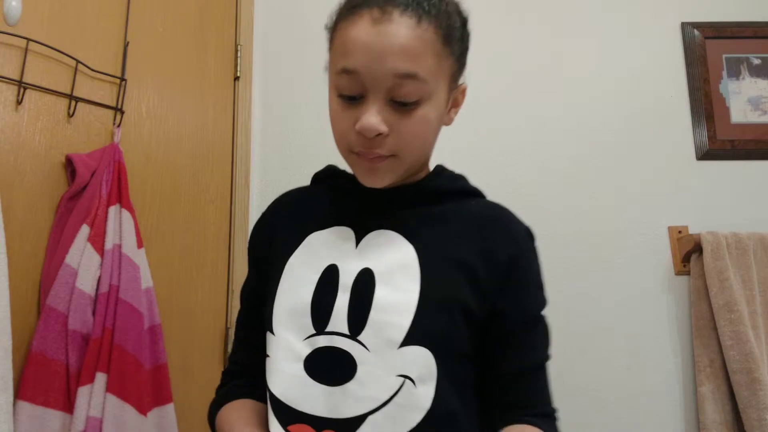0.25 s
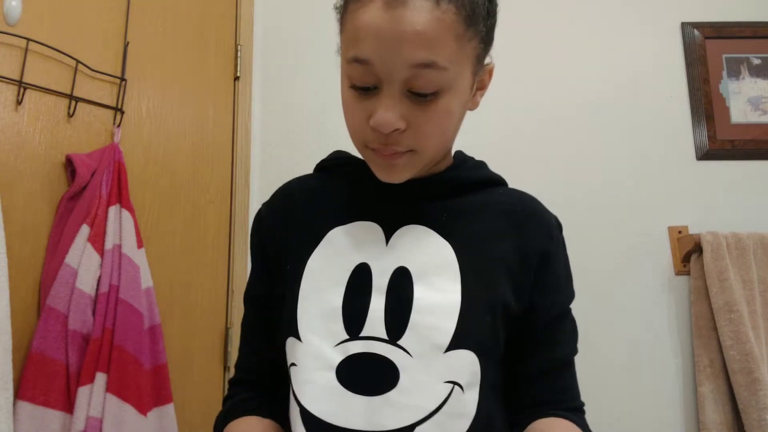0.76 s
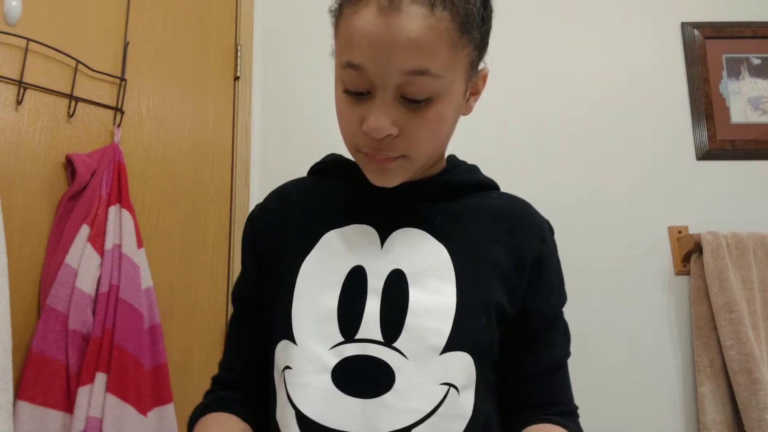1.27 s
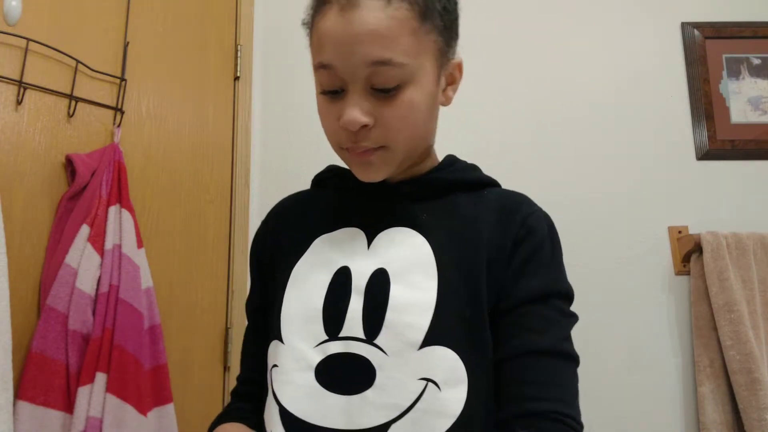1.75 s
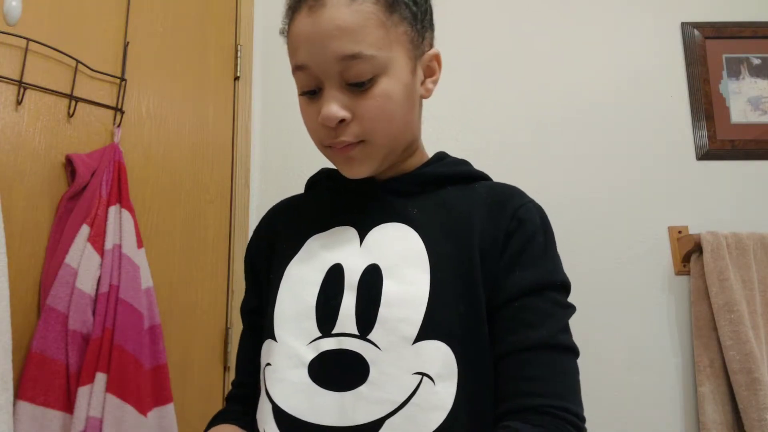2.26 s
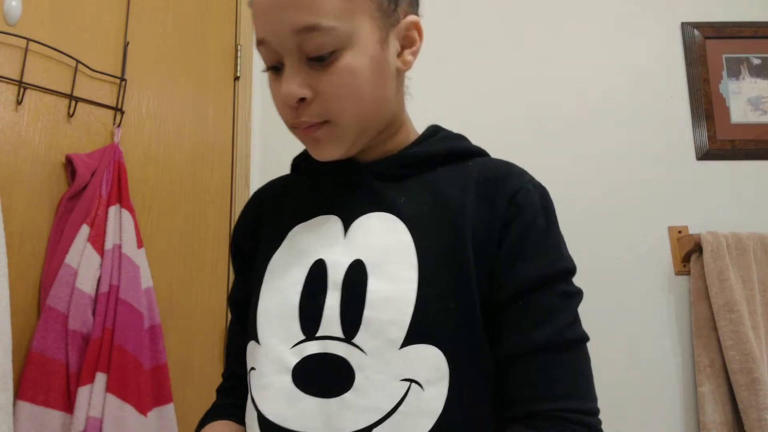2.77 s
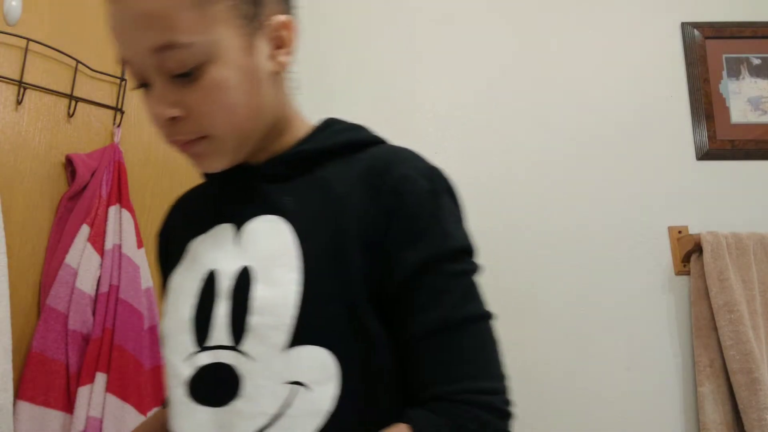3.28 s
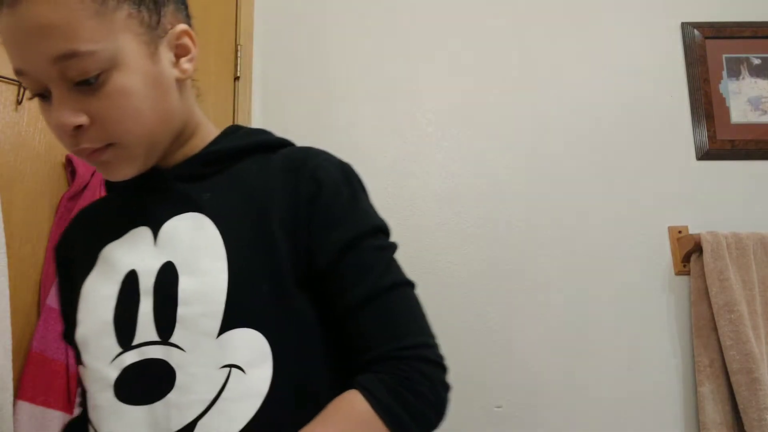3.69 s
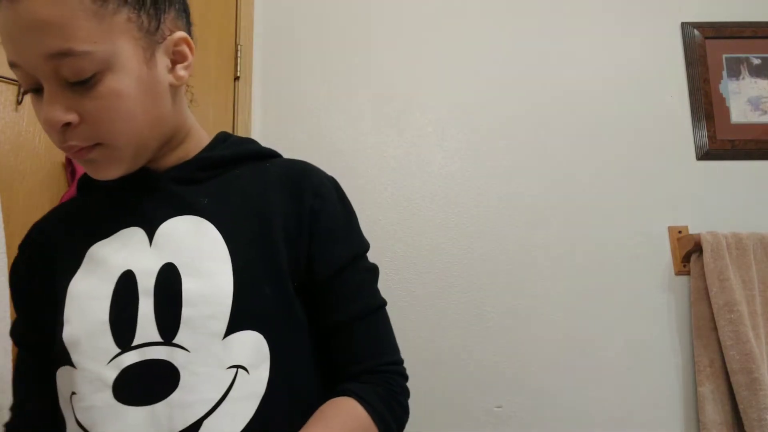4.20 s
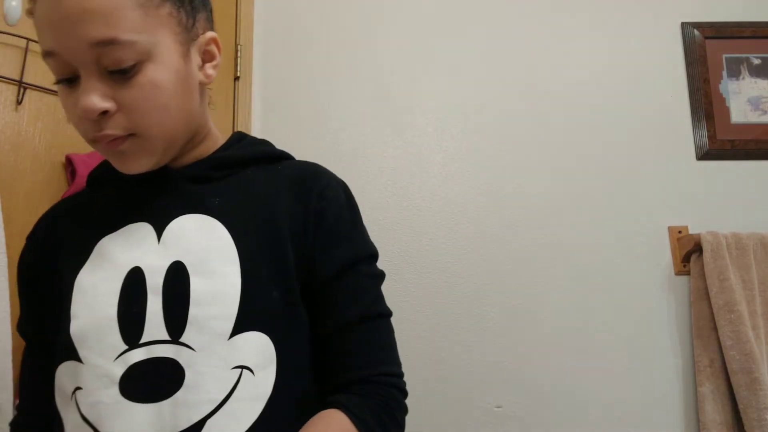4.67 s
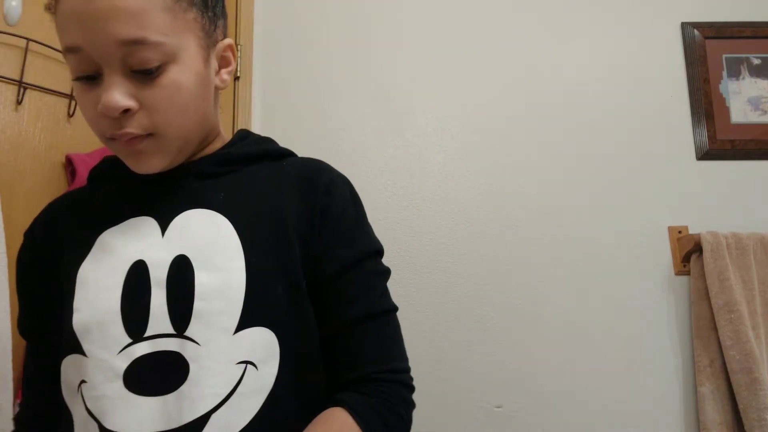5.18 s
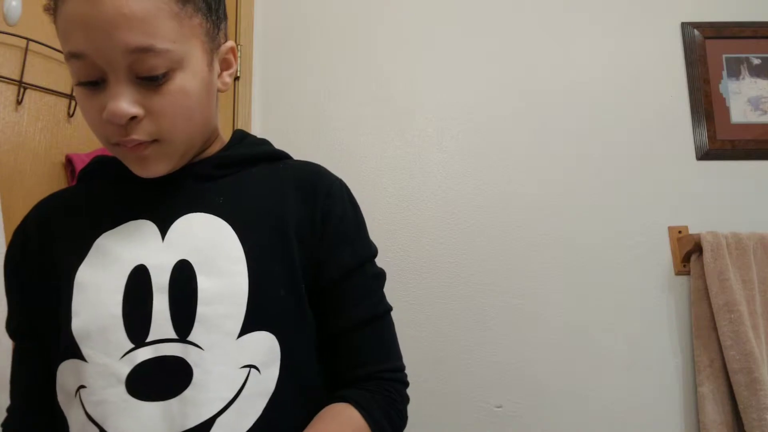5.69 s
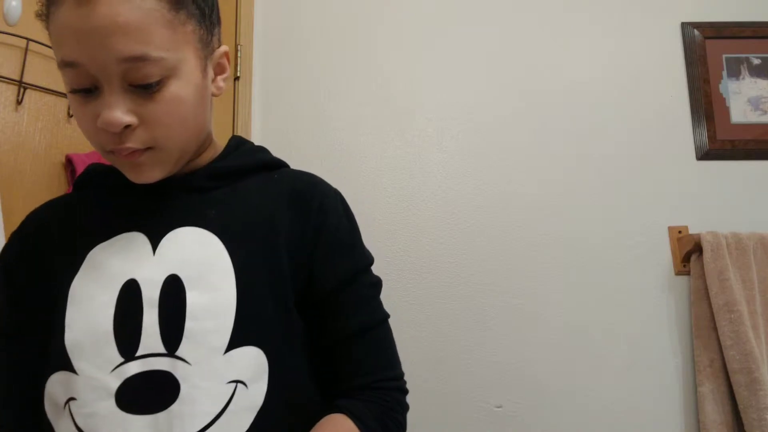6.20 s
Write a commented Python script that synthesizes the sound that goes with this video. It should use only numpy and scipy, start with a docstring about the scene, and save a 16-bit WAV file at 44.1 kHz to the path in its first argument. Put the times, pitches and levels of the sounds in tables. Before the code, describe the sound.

Close to the microphone in a small tiled bathroom, someone sorts through plastic makeup containers over a low, quiet hum. Two sharp clasp clicks and a short scrape lead to the loudest sound, a case knocking on the counter. The containers then clatter, slide and tap in uneven bursts, with a few soft low thuds from a hand. Each knock has a short room echo.

```python
"""Plastic make-up cases on a hard counter in a tiled bathroom, close to a phone microphone.
Over mains hum and faint hiss, the cases slide in tiny slips and tap, ringing shells, lids and counter.
From 1 s clasps snap; at 2 s a dragged case sings, then comes the loudest knock and a soft thud of a hand.
Clatter and thuds return near 4 s; faint, narrow bands waver near 1.5 and 2.3 kHz from 4.5 to 5 s.
More knocks come just after 5 s and 6 s. The tiles answer with two early echoes and a short tail."""
import sys
import numpy as np
from scipy import signal
from scipy.fft import rfft, irfft
from scipy.io import wavfile
from scipy.ndimage import uniform_filter1d

SR = 44100
rng = np.random.default_rng(int(sys.argv[2]) if len(sys.argv) > 2 else 0)


def transcribe(u):
    """Save the signal u as a 16-bit wav file named by the first command-line argument.

    u: samples, shape (n,) or (channels, n), limited to [-1, 1]; the rate is SR.
    q: integer samples, one column per channel.
    """
    v = np.clip(np.atleast_2d(u).T, -1, 1)
    q = np.round(v * 32767).astype(np.int16)
    wavfile.write(sys.argv[1], SR, q)


N = 284445

# Spectrum of the hiss: frequency_hz, relative_density_db
HISS_SPECTRUM = [(15, -38.5), (25, -11), (69, -0.5), (140, -10.5), (270, -15), (519, -24), (971, -26),
                 (3590, -36.5), (5180, -43), (6550, -44.5), (12900, -55.5), (16800, -78.5), (22000, -120)]
# Hand strokes sliding a case: firmest_s, swell_s, fade_s, case_db, lid_db, tick_db, counter_db
# (the last three relative to the case)
STROKES = [(0.15, .15, 0.18, -79.5, 7.5, -1.5, 10.5), (0.41, 0.28, .12, -80, -2, -8, -8),
           (0.59, 0.063, 0.094, -80.5, -2, -10, 12.5), (0.85, 0.2, 0.12, -91.5, -7.5, -16, 16.5),
           (1.65, 0.062, .1, -73, -29, -33, -14), (1.81, 0.17, 0.14, -51.5, -16, -27, -15),
           (1.859, 0.043, 0.028, -60, -6, -19, 1), (2.15, 0.28, .2, -69.5, -2, -11, -4),
           (2.33, 0.16, 0.24, -64.5, 6, -13.5, -3.5), (2.67, .15, 0.095, -51, -14, -28.5, -13),
           (2.95, 0.147, .2, -69.5, -11, -11.5, -1), (3.139, 0.19, 0.19, -76, 2, -12.5, 0),
           (3.4, .1, .1, -72.5, -8, -6, -4.5), (3.86, 0.15, 0.06, -48.5, -14, -27, -2.5),
           (4.099, 0.37, 0.31, -58.5, 1.5, -14.5, -1), (4.22, 0.09, .06, -61.5, -4, -14, 3),
           (4.4, .2, 0.16, -82, -11.5, -24.5, -10), (4.6, 0.25, 0.45, -72.5, -3, -14, 10),
           (4.95, 0.69, 0.094, -64, 0, -15, -6.5), (5.044, 0.056, 0.09, -45, -17.5, -27.5, -14),
           (5.15, 0.14, 0.16, -48.5, -11, -29, 2.5), (5.279, 0.29, 0.14, -59.5, -4, -13.5, -11.5),
           (5.729, 0.33, .2, -67, -3, -11, -2), (6.08, 0.39, 0.076, -66.5, -8, -22, 2),
           (6.149, 0.12, 0.16, -48.5, -11.5, -17, -13.5), (6.27, 0.31, 0.3, -64, -10, -6.5, -12)]
# Modes of the hollow case, its lid, the bright contact tick and the counter: pitch_hz, level_db, t60_s
CASE_MODES = [(581, -7, 0.089), (708, -1, 0.034), (774, -18, 0.075), (846.7, 5.5, 0.029), (934, -7, 0.035),
              (1074, -3.5, 0.061), (1366, -7, 0.06), (1500, -7, 0.095)]
LID_MODES = [(1574, 5, 0.0044), (2011, 2, 0.025), (2215, -5.5, 0.069), (2441, -10.5, 0.035),
             (2720, -8.5, 0.033), (3110, -6.5, 0.023), (3360, -16.5, 0.06), (3670, -11, 0.032),
             (4480, -17.5, 0.022)]
TICK_MODES = [(4340, -5, .003), (4900, -6.5, 0.004), (5700, -7, 0.0044), (6530, 0.5, 0.0096),
              (7300, -3, 0.0033), (8200, -7, 0.0049), (9300, -5, 0.0035), (10900, -9.5, 0.0023),
              (12600, -17, .002)]
COUNTER_MODES = [(44, -17.5, 0.28), (62, -15.5, 0.27), (122, -8.5, .15), (181, -11.5, 0.15),
                 (258.4, -6, 0.075), (351.4, -8.5, 0.12), (494.3, -9, 0.14)]
# Cases knocking on the counter: start_s, case_db, lid_db, tick_db, counter_db, sustain_ratio, favoured_hz
# (lid, tick and counter relative to the case; case modes near favoured_hz are weakened least)
BLOWS = [(0.1, -75, 9, -7, -2, 0.57, 790), (0.128, -72, -13, 3, 6, 0.62, 904),
         (0.414, -65, 4, -16, -17, 0.4, 689), (0.583, -63.5, -9, -5, 9.5, 0.62, 546),
         (0.96, -82, -8, 4, -11.5, 0.5, 800), (1.042, -40.5, -4, 13.5, -9, 0.47, 740),
         (1.179, -63.5, 7.5, 12, -10, 0.62, 1100), (1.307, -42, 1.5, 12, -45, 0.81, 700),
         (1.583, -61.5, -39, -37.5, -8, 0.83, 820), (1.631, -47.5, -37, -29, -20, 0.9, 835),
         (1.678, -41.5, -39, -47, -29, 0.5, 735), (1.718, -36, -15, -10.5, -27, 1, 1050),
         (1.797, -50, -28, -15, -9, 0.39, 820), (1.819, -46.5, -33, -35, 1.5, 0.72, 735),
         (1.958, -39.5, -1, -10, -37, 0.93, 1040), (2.238, -69, -3, -21, -8, 0.63, 1320),
         (2.269, -61.5, 9.5, -14, -12, 1, 1210), (2.397, 3, -12, -19.5, -15.5, 0.4, 706),
         (2.417, -8, -2, -19, -13.5, 0.46, 840), (2.533, -25.5, -13, -33, -10, 0.89, 690),
         (2.689, -41.5, -14.5, -28, -19, 0.88, 631), (2.735, -41, 4, -10, -23.5, 0.58, 1180),
         (2.841, -69, -4, 2.5, -3.5, 0.53, 585), (2.979, -64, -3, -2, -11, 0.88, 791),
         (3.106, -59.5, -1.5, -2, 1.5, 0.86, 786), (3.312, -35.5, -16, -25, -20, 0.77, 930),
         (3.337, -50.5, -18.5, -17, -16, 0.2, 952), (3.42, -65.5, -1.5, -1, -4, 0.87, 966),
         (3.563, -58.5, -9.5, -25, -4, 0.78, 730), (3.68, -47, -17, -17, -4.5, 0.91, 829),
         (3.715, -14.5, 4.5, -23, -3, 0.21, 740), (3.732, -19.5, -3, -24, -3, 0.36, 783),
         (3.756, -30, 0, -16, -6.5, 0.79, 950), (3.809, -29.5, 3, -29, -10, 0.29, 780),
         (3.826, -27, -0.5, -22, -7, 0.45, 700), (3.962, -33.5, -14.5, -20.5, -36, 0.96, 750),
         (3.976, -26, -10, -28.5, -6.5, 0.39, 787), (4.05, -16.5, -24.5, -36.5, -12, 0.57, 735),
         (4.084, -35.5, -6, -25, -5, 1, 846), (4.103, -33, -1, -31, -19, 0.53, 845),
         (4.145, -36.5, -9, -37, -26, 0.71, 579), (4.177, -56, 10, -21, -17, 1, 821),
         (4.246, -26, -33, -52, -18.5, 0.38, 730), (4.466, -54, -13.5, -11.5, 3, 1, 830),
         (4.485, -41.5, -1.5, -8, -3.5, 0.65, 1120), (4.61, -67, 7, -25, 4, 0.61, 729),
         (4.769, -53.5, -2.5, -23, 3, 0.97, 704), (4.927, -46, -6.5, -26, -21, 0.86, 939),
         (5.132, -26.5, -32.5, -33, -28.5, 0.49, 752), (5.16, -31.5, -22, -26, -12, 0.68, 977),
         (5.244, -36.5, -16, -14, -3.5, 0.85, 700), (5.258, -34, -17, -40.5, -7.5, 0.97, 646),
         (5.518, -50.5, -19, -21, -8, 0.81, 580), (5.625, -54.5, -28, -29.5, -24.5, 0.61, 845),
         (5.688, -49, -13, -19.5, -13.5, 0.57, 703), (5.734, -46.5, -12, -22, -11, 0.93, 759),
         (5.973, -51.5, -18.5, -37.5, -7, 0.8, 568), (6.105, -19.5, -42.5, -38, -11, 0.46, 743),
         (6.141, -40, -8, -25, 1, 0.69, 760), (6.205, -26.5, -23.5, -24, -16.5, 0.96, 569),
         (6.253, -37, -16, -1.5, -27, 0.74, 1090), (6.273, -24.5, -42, -48, -25, 0.4, 1120),
         (6.285, -22.5, -36.5, -47, -11.5, 0.6, 610), (6.297, -34, -6.5, -37, -26, 1, 700),
         (6.379, -52, -8, -40, 7.5, 0.67, 686)]
# A clasp lets go or catches: start_s, level_db
CLASP_SNAPS = [(1.042, -32), (1.179, -64), (1.308, -31.5)]
# Modes of a clasp: pitch_hz, level_db, t60_s
CLASP_MODES = [(1565, 4.5, 0.0053), (2740, 6, 0.0071), (3830, 4, 0.01), (4170, -3.5, 0.031),
               (5420, -2.5, 0.012)]
# Spells of narrow, wavering bands: start_s, length_s, first_pitch_hz, last_pitch_hz, level_db, width_hz
WAVERING_SPELLS = [(2.02, .33, 2057, 2220, -64.5, 399), (4.523, 0.504, 2270, 2280, -72, 257)]
# The bands within each spell: pitch_ratio, relative_db
WAVERING_BANDS = [(.43, -16), (.67, -4.5), (1, -1), (1.272, -14)]
# The heel of a hand leans on the counter: centre_s, level_db, pitch_hz, length_s
HAND_THUDS = [(2.465, -55, 47.3, 0.13), (3.993, -53, 63.8, 0.047), (4.099, -47.5, 66.3, 0.083),
              (4.62, -54, 61.4, 0.085), (4.77, -50.5, 125, 0.026), (5.23, -53, 131, 0.065),
              (6.153, -60.5, 109.5, 0.038), (6.391, -47.5, 94.4, 0.047)]
# Early echoes off the tiles: delay_s, level_db
WALL_ECHOES = [(.007, -9.5), (.019, -11.5)]
# Bands of the room's tail: centre_hz, level_db, t60_s
ROOM_TAIL = [(152, 1.5, 0.6), (400, -1.5, 0.23), (990, 0, 0.15), (2500, -5, 0.25), (4700, -1.5, 0.3),
             (8600, 0.5, 0.18)]


def undb(db):
    """Decibels to amplitude."""
    return 10 ** (np.asarray(db) / 20)


def level(x, db):
    """Scale to an rms level."""
    return x * undb(db) / np.sqrt(np.mean(x ** 2))


def band(x, hz, width_hz):
    """Two-pole resonance, gain 1 at the centre."""
    return signal.lfilter(*signal.iirpeak(hz, hz / width_hz, SR), x)


def wander(rate_hz, size=N):
    """Smooth random drift, rms 1."""
    span = int(SR / rate_hz)
    return level(uniform_filter1d(uniform_filter1d(rng.standard_normal(size), span), span), 0)


def mains_hum(hum_hz=59, hum_db=-61, buzz_hz=129, buzz_width_hz=49, buzz_db=-72.5):
    """A hum wavering in strength and pitch, with a rough buzz about an octave up."""
    strength = undb(hum_db) * (1 + 0.48 * wander(17))
    phase = 2 * np.pi * np.cumsum(hum_hz + 2.5 * wander(19)) / SR
    buzz = band(band(rng.standard_normal(N), buzz_hz, buzz_width_hz), buzz_hz, buzz_width_hz)
    return strength * np.sin(phase) + level(buzz, buzz_db)


def hiss(level_db=-71.5, swell_db=2.5):
    """Faint room tone, strongest in the bass, that swells slowly."""
    bins_hz = np.maximum(np.fft.rfftfreq(N, 1 / SR), 1)
    hz, db = np.transpose(HISS_SPECTRUM)
    colour = undb(np.interp(np.log(bins_hz), np.log(hz), db))
    noise = irfft(rfft(rng.standard_normal(N)) * colour, N)
    return level(noise, level_db) * undb(swell_db * wander(3.1))


def slips(modes, slips_per_s=2500, scatter_db=2, judder_db=3.5, damping=5.2):
    """Uneven stick-slip clicks feed a body whose modes the hand damps and so widens; rms 1."""
    force = undb(scatter_db * rng.exponential(size=N) + judder_db * wander(40))
    clicks = force * rng.standard_normal(N) * (rng.random(N) < slips_per_s / SR)
    out = 0
    for hz, db, t60 in modes:
        width_hz = min(damping * np.log(1000) / np.pi / t60, hz / 2)  # free width: ln(1000) / (pi t60)
        out = out + level(band(band(clicks, hz, width_hz), hz, 2 * width_hz), db)
    return level(out, 0)


def sliding(stroke_db=20, skid_db=-19, skid_fade_s=.09):
    """Friction rises stroke_db over each swell and drops as much over the fade; knocked cases skid on."""
    t, power = np.arange(N) / SR, np.zeros((4, N))
    # caps on the case, lid and tick levels keep a skid quiet and dull
    skids = [(s + 0.0026, .003, skid_fade_s, min(db, -36) + skid_db, min(lid, -3), min(tick, -16), counter)
             for s, db, lid, tick, counter, _, _ in BLOWS]
    for s, swell, fade, db, *shares_db in STROKES + skids:
        span = slice(max(int((s - 1.5 * swell) * SR), 0), int((s + 1.5 * fade) * SR))
        pressure_db = db - stroke_db * np.maximum((s - t[span]) / swell, (t[span] - s) / fade)
        power[:, span] += undb(pressure_db + np.array([0, *shares_db])[:, None]) ** 2
    bodies = CASE_MODES, LID_MODES, TICK_MODES, COUNTER_MODES
    return sum(envelope * slips(modes) for envelope, modes in zip(np.sqrt(power), bodies))


def ring(modes, t, sustain, favoured_hz=None, contact_cycles=0.51):
    """Damped sines of one blow; where it lands scatters each mode's strength and pitch."""
    hz, db, t60 = np.transpose(modes)[:, :, None]
    detune, strength = rng.standard_normal((2, 9, 1))[:, :len(modes)]
    if favoured_hz:
        db = db - 23.5 * np.abs(np.log2(hz / favoured_hz))  # dB per octave away
    hz = hz * (1 + .015 * detune)
    polarity = (-1) ** np.arange(len(modes))[:, None]  # neighbouring modes start in opposite directions
    gain = polarity * undb(db + 2 * strength)
    rise = (1 - np.exp(-t * hz / contact_cycles)) ** 2  # the contact lasts a moment, so modes swing in
    decay = np.exp(-np.log(1000) * t / t60 / sustain)
    return np.sum(gain * rise * decay * np.sin(2 * np.pi * hz * t), axis=0)


def knocks():
    """Each blow rings case, lid, tick and counter in its own mix; the hand damps some blows more."""
    out, t = np.zeros(N + SR), np.arange(SR // 8) / SR
    for start_s, case_db, lid_db, tick_db, counter_db, sustain, favoured_hz in BLOWS:
        blow = (ring(CASE_MODES, t, sustain, favoured_hz)
                + undb(lid_db) * ring(LID_MODES, t, sustain)
                + undb(tick_db) * ring(TICK_MODES, t, sustain=1)
                + undb(counter_db) * ring(COUNTER_MODES, t, sustain))
        out[int(start_s * SR):][:len(t)] += undb(case_db) * blow
    return out[:N]


def clasp_snaps():
    """A lid's clasp rings short and bright as it lets go or catches."""
    out, t = np.zeros(N + SR), np.arange(SR // 16) / SR
    for start_s, db in CLASP_SNAPS:
        out[int(start_s * SR):][:len(t)] += undb(db) * ring(CLASP_MODES, t, sustain=0.63)
    return out[:N]


def wavering_bands(waver_db=5.5):
    """A few narrow, rough bands glide together, each wavering in level."""
    out = np.zeros(N)
    for start_s, length_s, first_hz, last_hz, db, width_hz in WAVERING_SPELLS:
        span = np.arange(int(start_s * SR), int((start_s + length_s) * SR))
        n = len(span)
        phase = 2 * np.pi * np.cumsum(np.linspace(first_hz, last_hz, n)) / SR
        for ratio, share_db in WAVERING_BANDS:
            envelope = undb(db + share_db + waver_db * wander(15, n)) * signal.windows.tukey(n, .2)
            sine = wander(width_hz, n) * np.sin(ratio * phase)
            cosine = wander(width_hz, n) * np.cos(ratio * phase)
            out[span] += envelope * (sine + cosine)
    return out


def hand_thuds():
    """The heel of a hand pushes softly on the counter: a few low cycles that swell and fade."""
    out, t = np.zeros(N + SR), np.arange(-SR // 4, SR // 4) / SR
    for centre_s, db, hz, length_s in HAND_THUDS:
        push = undb(db) * np.exp(-(2 * t / length_s) ** 2)
        out[int(centre_s * SR) - SR // 4:][:len(t)] += push * np.sin(2 * np.pi * hz * t)
    return out[:N]


def bathroom(x, build_s=.006, smear_s=.0015):
    """Direct sound, two wall echoes scattered by the tiles, and a tail that dies band by band."""
    t = np.arange(SR // 2) / SR
    response = np.zeros(len(t))
    for hz, db, t60 in ROOM_TAIL:
        envelope = (1 - np.exp(-t / build_s)) * np.exp(-np.log(1000) * t / t60)
        tail = band(band(rng.standard_normal(len(t)), hz, hz), hz, 2 * hz) * envelope
        response += tail * undb(db) * np.sqrt(hz / SR / np.sum(tail ** 2))
    for delay_s, db in WALL_ECHOES:
        echo = rng.standard_normal(len(t)) * np.exp(-np.abs(t - delay_s) / smear_s)
        response += echo * undb(db) / np.sqrt(np.sum(echo ** 2))
    response[0] += 1  # straight path to the microphone
    return signal.fftconvolve(x, response)[:N]


def scene(bass_hz=40, treble_hz=11250):
    """The handling and its echoes from close by the counter, in mono, over hum and hiss."""
    near = bathroom(knocks() + clasp_snaps() + hand_thuds() + sliding() + wavering_bands())
    # the recorder rolls off the treble above 11 kHz
    near = signal.sosfilt(signal.butter(4, treble_hz, fs=SR, output="sos"), near)
    # small things give no deep bass
    near = signal.sosfilt(signal.butter(2, bass_hz, "high", fs=SR, output="sos"), near)
    return (near + mains_hum() + hiss())[None]


def record(dry, port_hz=6260, port_db=-6.5, ceiling=1.2, top_hz=15400):
    """The microphone port resonates in the treble, the loudest peaks are rounded, the top is cut."""
    wet = dry + undb(port_db) * band(dry, port_hz, width_hz=1000)
    wet = ceiling * np.tanh(wet / ceiling)
    return signal.sosfilt(signal.ellip(8, .2, 70, top_hz, fs=SR, output="sos"), wet)


dry = scene()
out = record(dry)
transcribe(out)
```